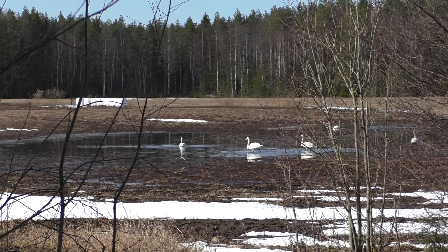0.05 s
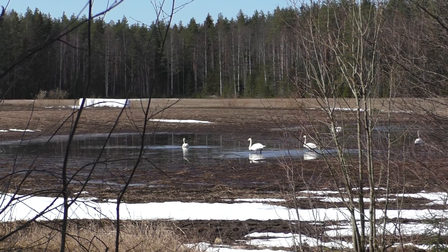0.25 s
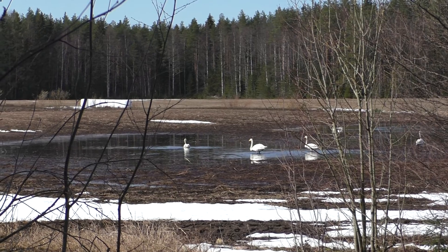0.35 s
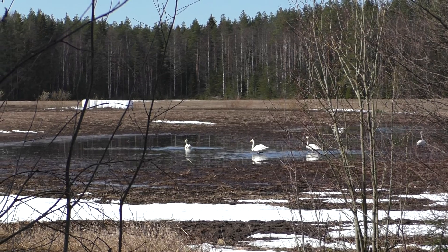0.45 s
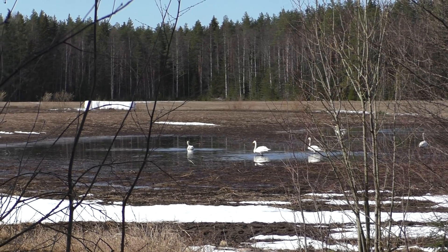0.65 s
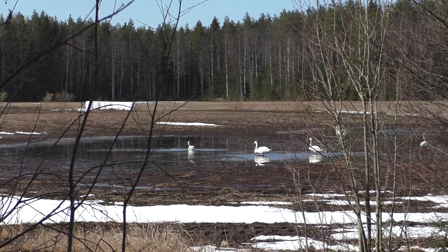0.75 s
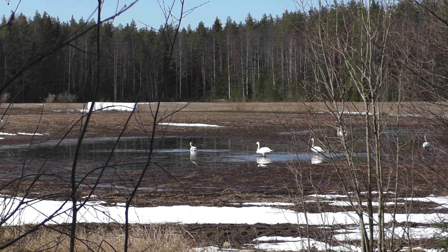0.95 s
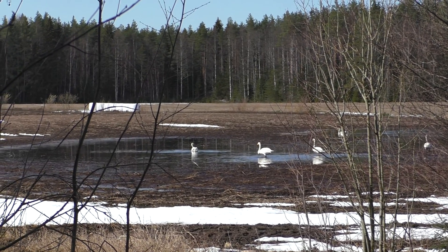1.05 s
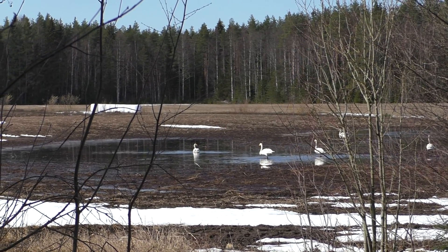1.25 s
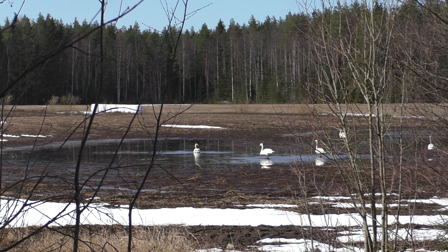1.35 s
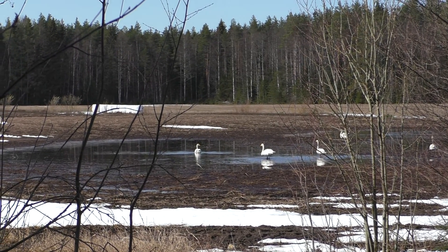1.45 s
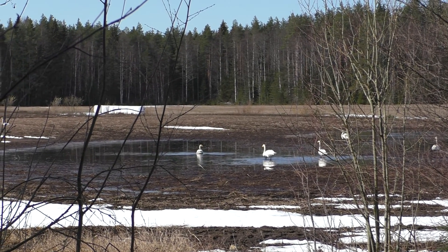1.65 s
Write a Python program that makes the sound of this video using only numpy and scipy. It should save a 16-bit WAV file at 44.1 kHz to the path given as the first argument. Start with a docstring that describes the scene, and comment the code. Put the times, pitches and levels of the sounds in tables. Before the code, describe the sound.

Distant swans honk across an open field, starting softly at about 0.1 seconds and growing louder as their nasal calls overlap with a light echo. Near 0.6 and 1.2 seconds a call breaks into a clear high note, and the honking ends around 1.5 seconds. A small bird gives faint, thin chirps from 0.3 seconds onward. A twig ticks just after the last honk. Low air rumble and hiss continue throughout.

```python
"""Over distant air rumble and microphone hiss, swans start honking across a flooded field.
Each honk is a train of pulses ringing a long windpipe. The calls overlap, and the ground and
forest edge scatter them back. A small bird soon joins in with thin, arched chirps. Near 0.6 s
and again near 1.2 s, a swan's voice breaks into a clear high note. After the last honk,
a twig ticks during the bird's final chirp."""
import sys
import numpy as np
from scipy import signal
from scipy.fft import rfft, irfft
from scipy.io import wavfile
from scipy.ndimage import uniform_filter1d

SR = 44100
rng = np.random.default_rng(int(sys.argv[2]) if len(sys.argv) > 2 else 0)


def master(y):
    """Save y as 16-bit WAV."""
    cut = np.clip(np.atleast_2d(y).T, -1, 1)
    pcm = np.round(cut * 32767)  # scale
    wavfile.write(sys.argv[1], SR, pcm.astype(np.int16))


N = 74970
TIME = np.arange(N) / SR

# How each low honk moves in pitch (its pulse rate) and loudness: t/s, f/Hz, level/dB
OPENING = [(.145, 215.9, -67), (.17, 220.4, -59.5), (.205, 240, -57.5), (.235, 259, -50), (.26, 264, -48),
           (.29, 256, -51.5), (.32, 246, -55.5), (.355, 245.9, -52.5), (.385, 255.4, -58), (.43, 251, -74)]
FIRST_RISE = [(.48, 249, -60), (.525, 259.3, -59.5), (.55, 280.6, -46), (.58, 297.3, -48), (.6, 300, -42),
              (.62, 303, -83), (.66, 292, -55)]
UNDER_HONK = [(.56, 274, -53.5), (.59, 277, -52.5), (.635, 267, -50), (.67, 275, -54), (.71, 268, -54),
              (.74, 253, -60), (.8, 262, -62.5), (.815, 260, -60)]
REPLY = [(.805, 253.7, -65), (.83, 264.7, -52), (.855, 275.5, -47), (.89, 264.4, -57.5),
         (.912, 265.7, -50.5), (.93, 255.6, -56)]
REPLY_END = [(.905, 267.3, -69), (.93, 266.7, -49.5), (.97, 267, -54.5), (.998, 264.6, -48.5),
             (1.02, 257, -56.5), (1.035, 260, -80)]
SECOND_RISE = [(1.102, 272, -55), (1.12, 276.3, -50), (1.137, 294.1, -44), (1.16, 290.9, -47),
               (1.178, 297.8, -43), (1.195, 318.7, -45), (1.225, 317, -49.5), (1.25, 306, -62)]
HIGH_HONK = [(1.19, 329.5, -45), (1.208, 357.8, -43.5), (1.23, 352, -39), (1.245, 351.4, -40.5),
             (1.26, 338.7, -43), (1.28, 330, -52)]
CLOSING = [(1.255, 302.6, -43.5), (1.285, 301.2, -44), (1.31, 291.5, -43), (1.33, 301.5, -43.5),
           (1.355, 287.6, -55)]
LAST_HONK = [(1.315, 260.5, -42.5), (1.34, 255.9, -51.5), (1.36, 246.5, -49), (1.385, 248, -46.5),
             (1.415, 251.2, -56), (1.44, 259, -55.5), (1.47, 259, -72)]
# How the two clear high notes move: t/s, f/Hz, level/dB
FIRST_NOTE = [(.59, 915, -52), (.61, 938, -38.5), (.645, 940, -38), (.672, 936, -40), (.684, 930, -45),
              (.694, 921, -40), (.725, 915, -40), (.75, 888, -48), (.78, 845, -58)]
SECOND_NOTE = [(1.175, 865, -59), (1.19, 876.6, -40.5), (1.22, 878, -43), (1.243, 874.5, -45.5),
               (1.265, 840.5, -44), (1.285, 868, -40), (1.303, 840, -49), (1.33, 825, -48),
               (1.355, 807, -48)]
# Windpipe colours, meaning how strongly each frequency rings: f/Hz, level/dB
NASAL = [(500, -38), (760, -23), (1020, -15.5), (1280, -21), (1550, -4.5), (1800, -2), (2060, -10),
         (2330, -27), (2700, -31), (4000, -29), (6500, -42)]
OPEN = [(550, -32), (850, -15.5), (1170, 3), (1450, -2.5), (1750, 5), (2050, -1), (2330, -17),
        (2750, -20.5), (4200, -25.5), (6500, -39)]
MELLOW = [(550, -27), (800, -21), (1070, -8.5), (1330, -11), (1600, 1), (1870, -27), (2150, -10),
          (2420, -13), (2700, -22.5), (4000, -25.5), (6500, -42)]
ROUND = [(650, -41), (1050, -12), (1400, 1.5), (1750, 0), (2100, -22), (2450, -17), (2780, -15.5),
         (3150, -27), (5000, -31), (7000, -47)]
HOLLOW = [(550, -28.5), (760, -23), (1000, -13.5), (1250, -15.5), (1500, 2.5), (1750, -4), (2000, -11),
          (2600, -15.5), (3200, -37), (3900, -20), (6000, -40)]
REEDY = [(550, -35), (800, -25), (1065, -9), (1330, -3), (1595, 2), (1860, -15), (2130, -5.5),
         (2390, -11.5), (2660, -36), (2920, -12), (3300, -28.5), (4200, -25), (6500, -40)]
FLARED = [(550, -35), (850, -16), (1170, -4.5), (1450, -4), (1750, -0.5), (2050, 2.5), (2350, -7),
          (2650, -24), (3000, -29), (4200, -38), (6500, -61)]
HARSH = [(550, -41), (880, -19), (1170, -2.5), (1480, -5), (1770, 6), (2100, -4), (2650, -27.5),
         (4000, -22.5), (5000, -26.5), (7000, -47)]
FIRST_NOTE_COLOUR = [(500, -45), (920, -20.5), (1400, -15), (1850, -3), (2800, -31), (3700, -46),
                     (4700, -38), (5600, -44)]
SECOND_NOTE_COLOUR = [(500, -38), (870, -17), (1300, -19), (1740, 2.5), (2600, -16), (3500, -25),
                      (4400, -25), (5200, -36), (6200, -57)]
CRACK_COLOUR = [(600, -26.5), (1000, -17), (1300, -7.5), (1550, 0.5), (1800, -5.5), (2150, -10),
                (2600, -25), (3900, -21), (6500, -50)]
# The swan calls: pitch and loudness table, windpipe colour, roughness (0-1), how far the windpipe colour slides
# with the pitch (1 = fully), left minus right/dB
SWAN_CALLS = [(OPENING, NASAL, 0.15, 1.6, -5), (FIRST_RISE, FLARED, 0.26, 1.5, -2.3),
              (UNDER_HONK, MELLOW, 0.36, 0.52, -8), (REPLY, MELLOW, 0.11, 0.88, -3.5),
              (REPLY_END, REEDY, 0.069, 0.53, -3.2), (SECOND_RISE, OPEN, 0.145, 0.41, -1.8),
              (HIGH_HONK, ROUND, 0.0935, 0.39, -1.7), (CLOSING, HARSH, 0.186, 0.44, -2.1),
              (LAST_HONK, HOLLOW, 0.1543, 0.33, -9.5), (FIRST_NOTE, FIRST_NOTE_COLOUR, 0.037, 0.57, -7.5),
              (SECOND_NOTE, SECOND_NOTE_COLOUR, 0.051, 0.37, -6)]
# Hoarse catches where a voice cracks: middle t/s, length/s, f/Hz, level/dB
VOICE_CRACKS = [(0.194, 0.014, 215, -54.5), (0.351, 0.046, 225, -54), (.418, 0.036, 220, -59),
                (0.799, 0.037, 230, -53), (0.887, 0.028, 240, -53), (1.007, .035, 250, -55.5),
                (1.348, 0.023, 230, -46.5), (1.415, 0.042, 235, -50)]
# The small bird's chirps: start t/s, length/s, top f/Hz, level/dB
BIRD_CHIRPS = [(0.258, 0.068, 8170, -74.5), (0.499, 0.069, 8000, -70), (0.841, 0.047, 8150, -66.5),
               (0.946, .035, 8000, -75), (1.381, 0.066, 8080, -61.5), (1.515, .054, 8020, -62.5)]
# Colours of the twig's tick, the air, the low rumble and the hiss: f/Hz, level/dB
TICK_COLOUR = [(1000, -6), (3500, 3), (7000, 3), (10000, -2), (16000, -12)]
AIR_COLOUR = [(25, -14), (42, -7.5), (54, 5.5), (68, -2.5), (150, -4), (350, -5), (480, -10), (640, -17),
              (1000, -12.5), (1600, -12), (2500, -17.5), (4000, -24), (7000, -33.5), (16000, -51.5)]
RUMBLE_COLOUR = [(20, 7.5), (55, 9), (90, 2.5), (250, -4.5), (600, -35), (2000, -65)]
HISS_COLOUR = [(3000, -40), (7000, -12.5), (8800, -8.5), (10000, -2), (13500, -1.5), (16000, -3.5)]
# How the rumble and the hiss rise and fall (the hiss before HISS_GAIN_DB): t/s, level/dB
RUMBLE_SWELL = [(0, -70), (.5, -65), (.9, -58.5), (1.35, -63), (1.7, -75)]
HISS_SWELL = [(0.03, -72.5), (0.594, -70.5), (0.598, -69), (1.554, -70.5), (1.68, -72.5)]

FADE_S = 0.0049  # each call fades in and out this fast
JITTER, SHIMMER_DB = 0.0396, 7  # pitch wobble (a fraction) and loudness wobble at full roughness
FLUTTER_DB, FLUTTER_PER_S = 6.5, 30.8  # each overtone wavers by itself, more in a rough voice
TREBLE_HZ, DULLING = 1950, 0.15  # dB lost per octave above TREBLE_HZ for each dB below a call's peak
CHIRP_SCOOP_HZ, CHIRP_SCOOP_S, CHIRP_SAG_HZ = 1400, 0.00413, 640
AIR_DB, HISS_GAIN_DB = -56.5, 2.5
CRACK_PAN_DB, CHIRP_PAN_DB, ECHO_PAN_DB, AIR_PAN_DB, HISS_PAN_DB = -7.5, -12, -2, 2, -9


def swan(contour, windpipe, rough, follow=1):
    """Uneven pulses and puffs of rasp ring the windpipe; it opens as pitch rises, dulls as effort falls."""
    when, hz, db = np.array(contour, float).T
    fade = np.clip(np.minimum(TIME - when[0], when[-1] - TIME) / FADE_S + 1, 0, 1)
    live = fade > 0
    pitch, effort = np.interp(TIME, when, hz), np.interp(TIME, when, db)
    phase = 2 * np.pi * np.cumsum(pitch * (1 + JITTER * rough * wander(179))) / SR
    usual_hz = np.average(hz, weights=undb(db))
    harmonic = np.arange(1, int(windpipe[-1][0] / usual_hz) + 1)[:, None]
    # Where each overtone lands in the windpipe's colour, which slides up and down with the pitch.
    colour_hz = harmonic * pitch[live] * (usual_hz / pitch[live]) ** follow
    gains = response(windpipe)[np.minimum(colour_hz * 2 * N / SR, N).astype(int)]
    treble_octaves = np.log2(np.maximum(colour_hz / TREBLE_HZ, 1))
    gains = gains * undb(DULLING * (effort[live] - db.max()) * treble_octaves)
    flutter = np.array([wander(FLUTTER_PER_S, size=live.sum()) for _ in harmonic])
    gains = gains * undb(FLUTTER_DB * flutter * np.sqrt(rough))
    tone = np.zeros(N)
    tone[live] = (gains * np.exp(1j * harmonic * phase[live])).real.sum(0)
    tone[live] /= np.sqrt((np.abs(gains) ** 2).sum(0) / 2)  # colour does not change the level
    puffs = rng.standard_normal(N) * (1 + np.cos(phase)) ** 2  # one puff for each pulse
    rasp = unit(colour(puffs, windpipe))
    shimmer = unit(undb(SHIMMER_DB * rough * wander(340)))
    return (tone * shimmer + rough * rasp) * fade * undb(effort)


def voice_crack(middle, length, hz, db):
    """A swan's voice catches in a short, very rough swell."""
    edge_db = db - 6.5
    contour = [(middle - length / 2, hz, edge_db), (middle, hz, db), (middle + length / 2, hz, edge_db)]
    return swan(contour, CRACK_COLOUR, rough=0.5)


def bird_chirp(start, length, top_hz, db):
    """A thin whistle that scoops up and then sags."""
    age = np.clip(TIME - start, 0, length)
    progress = age / length
    scoop = CHIRP_SCOOP_HZ * np.exp(-age / CHIRP_SCOOP_S)
    hz = top_hz - scoop - CHIRP_SAG_HZ * progress ** 2.6 + 50 * wander(300)
    swell = np.abs(np.sin(np.pi * progress)) ** 0.57 * undb(db + 3.1 * wander(140))
    return swell * np.sin(2 * np.pi * np.cumsum(hz) / SR)


def twig_tick(start_s=1.5445, decay_s=0.0014, gain_db=-52, pan_db=-6):
    """One dry tick close by: a burst of noise that dies almost at once."""
    age = TIME - start_s
    burst = rng.standard_normal(N) * (age > 0) * np.exp(-np.abs(age) / decay_s)
    return pan(undb(gain_db) * colour(burst, TICK_COLOUR), pan_db)


def echoes(x, delay_s, build_s, fall_60db_s, db):
    """Countless small reflections, different for each ear; a delay below zero starts them part-way in."""
    age = np.maximum(TIME - delay_s, 0)
    build_up = 1 - np.exp(-age / build_s)
    decay = np.exp(-np.log(1000) * age / fall_60db_s)
    tail = undb(db) * unit(rng.standard_normal((2, N)) * build_up * decay) / np.sqrt(N)
    return signal.fftconvolve(x[None], tail, axes=1)[:, :N]


def distant_air():
    """Wide, faintly wavering air noise with one soft swell of low rumble."""
    air = unit(colour(rng.standard_normal((2, N)), AIR_COLOUR)) * undb(AIR_DB + 0.48 * wander(1.67))
    rumble = unit(colour(rng.standard_normal((2, N)), RUMBLE_COLOUR))
    swell = undb(np.interp(TIME, *np.array(RUMBLE_SWELL).T))
    return pan(air + rumble * swell, AIR_PAN_DB)


def microphone_hiss():
    """Faint, high noise, mostly shared by both ears and stronger on the right."""
    noise = rng.standard_normal(N) + 0.22 * rng.standard_normal((2, N))
    swell = undb(HISS_GAIN_DB + np.interp(TIME, *np.array(HISS_SWELL).T))
    return pan(unit(colour(noise, HISS_COLOUR)) * swell, HISS_PAN_DB)


def undb(db):
    """Turn decibels into a number to multiply by."""
    return 10 ** (np.asarray(db) / 20)


def unit(x):
    """Scale a sound so its average strength (rms) is 1."""
    return x / np.sqrt(np.mean(x ** 2))


def pan(x, db):
    """Place a sound to the left (db above zero) or to the right (below zero)."""
    gains = undb([[db / 2], [-db / 2]])
    return x * gains / gains.mean()


def wander(rate, size=N):
    """A smooth random drift of about 1 either way, changing about `rate` times a second."""
    span = max(int(SR / rate), 1)
    noise = rng.standard_normal(size + 2 * span)
    smooth = uniform_filter1d(uniform_filter1d(noise, span), span)
    return smooth[span:-span] * np.sqrt(3 * span / 2)


def response(points):
    """Build a filter from (f/Hz, level/dB) points, at N + 1 evenly spaced frequencies."""
    hz, db = np.array(points, float).T
    freq = np.maximum(np.linspace(0, SR / 2, N + 1), 1)
    gains = undb(np.interp(np.log(freq), np.log(hz), db))
    # These steps make the filter ring only after a sound arrives, never before.
    cepstrum = irfft(np.log(gains))
    cepstrum[1:N] *= 2
    cepstrum[N + 1:] = 0
    return np.exp(rfft(cepstrum))


def colour(x, points):
    """Make a sound's frequencies louder or softer, as a colour table says."""
    return irfft(rfft(x, 2 * N) * response(points))[..., :N]


def scene():
    """Distant swans, the small bird nearby, their echoes, a twig and the background."""
    swans = sum(pan(swan(*voice), pan_db) for *voice, pan_db in SWAN_CALLS)
    swans = swans + pan(sum(voice_crack(*row) for row in VOICE_CRACKS), CRACK_PAN_DB)
    bird = sum(bird_chirp(*row) for row in BIRD_CHIRPS)
    ground = echoes(swans.mean(0) + bird, delay_s=-0.55, build_s=4, fall_60db_s=0.55, db=-6)
    # A build time below zero keeps feeding the echo, so it dies away more slowly.
    forest = echoes(swans.mean(0), delay_s=0.2, build_s=-0.7, fall_60db_s=1.62, db=-18)
    calls = swans + pan(bird, CHIRP_PAN_DB) + pan(ground + forest, ECHO_PAN_DB)
    return calls + twig_tick() + distant_air() + microphone_hiss()


def record(dry):
    """The recorder cuts the very highest treble."""
    top_hz = 15800
    return signal.sosfilt(signal.ellip(10, .2, 70, top_hz, fs=SR, output="sos"), dry)


dry = scene()
out = record(dry)
master(out)
```